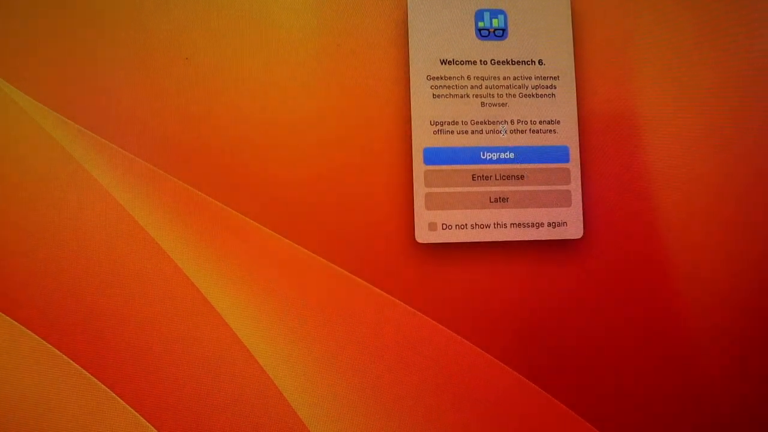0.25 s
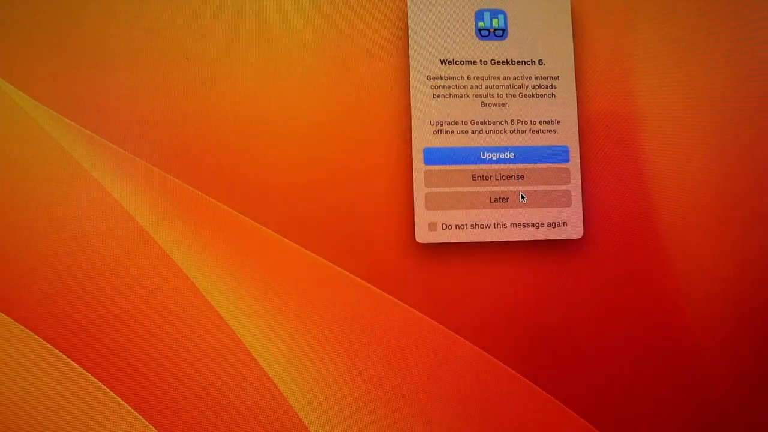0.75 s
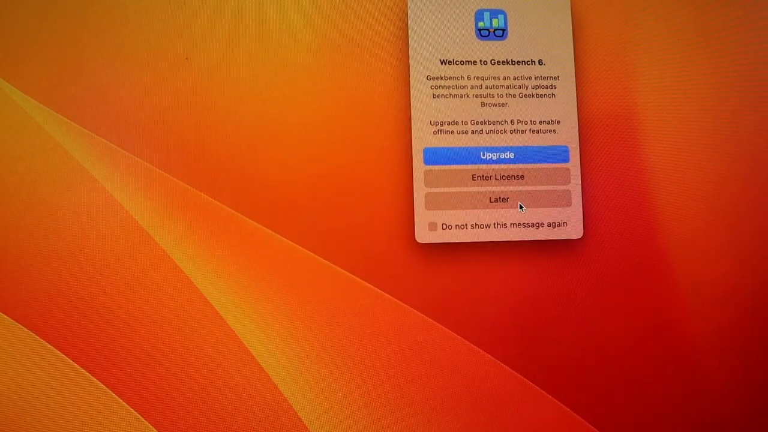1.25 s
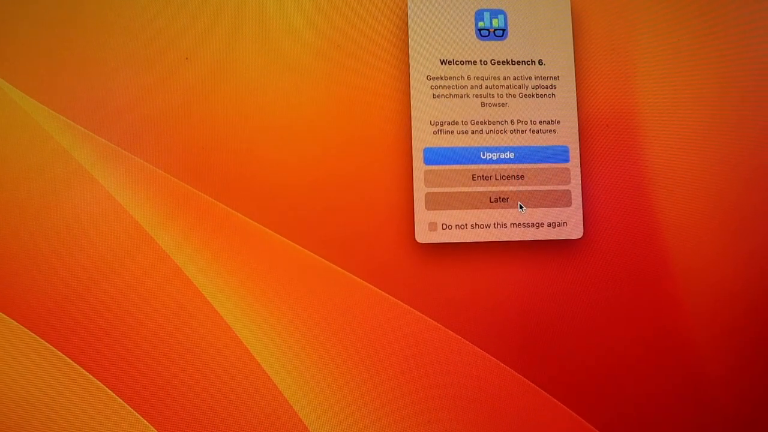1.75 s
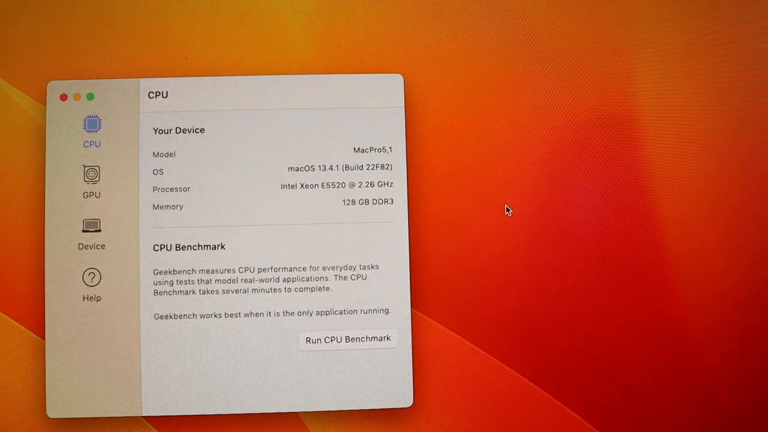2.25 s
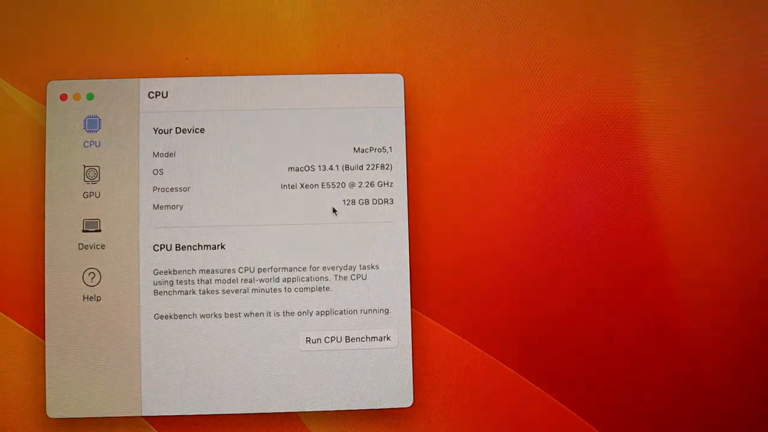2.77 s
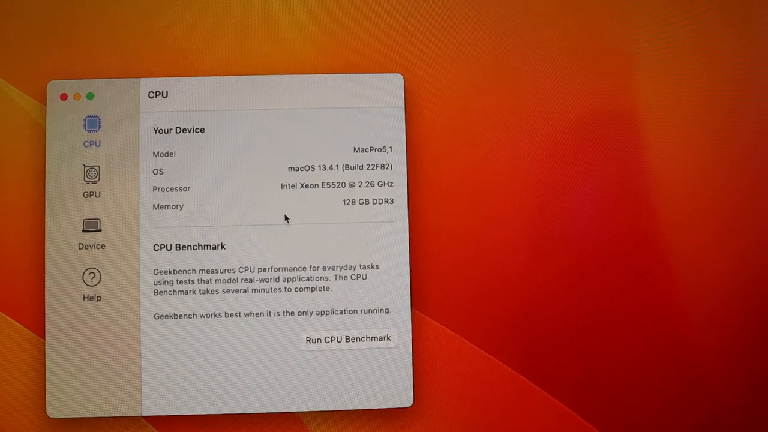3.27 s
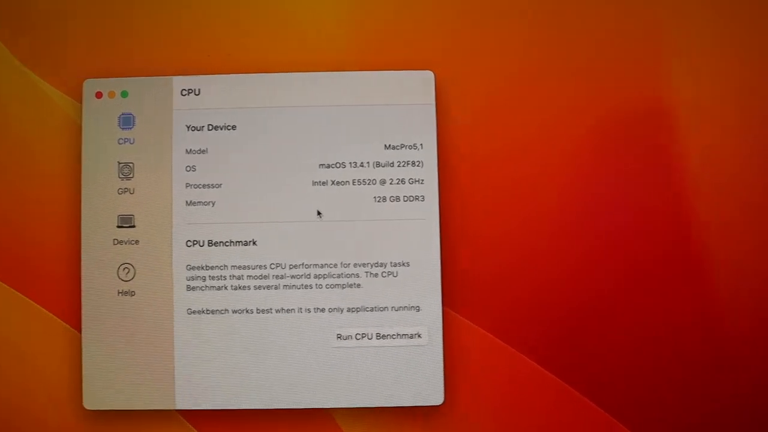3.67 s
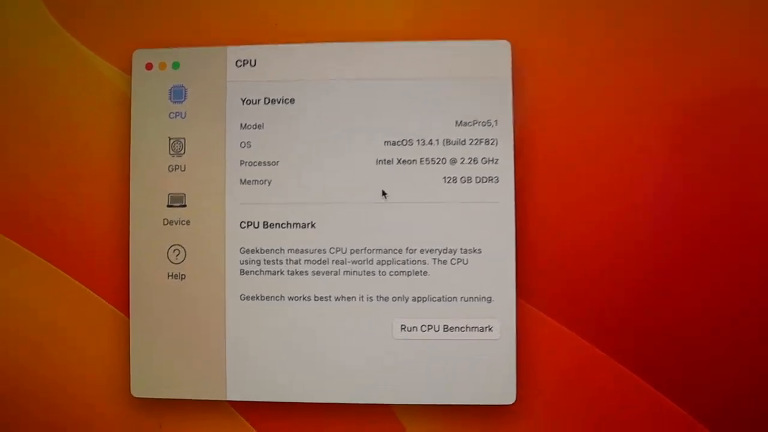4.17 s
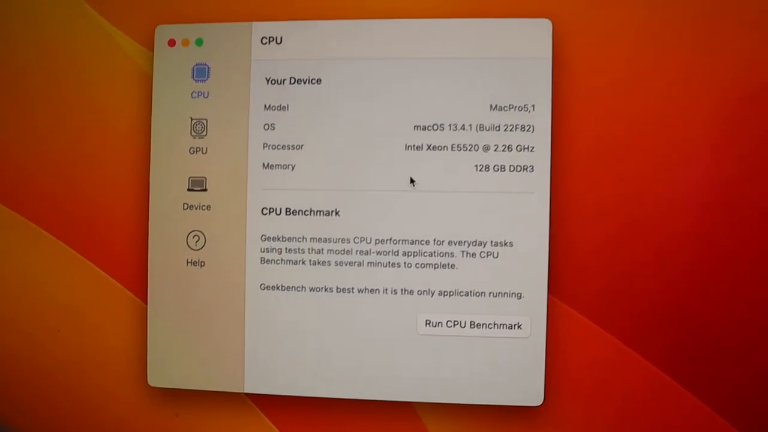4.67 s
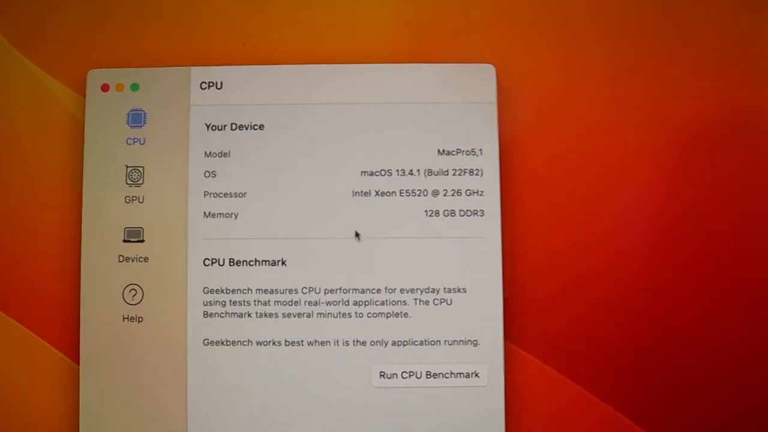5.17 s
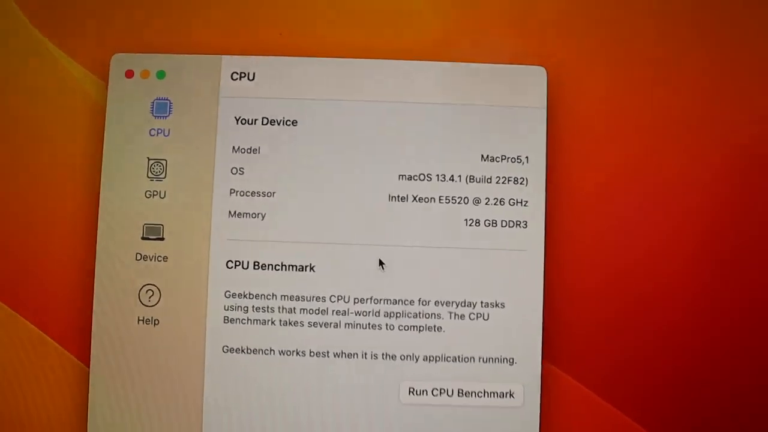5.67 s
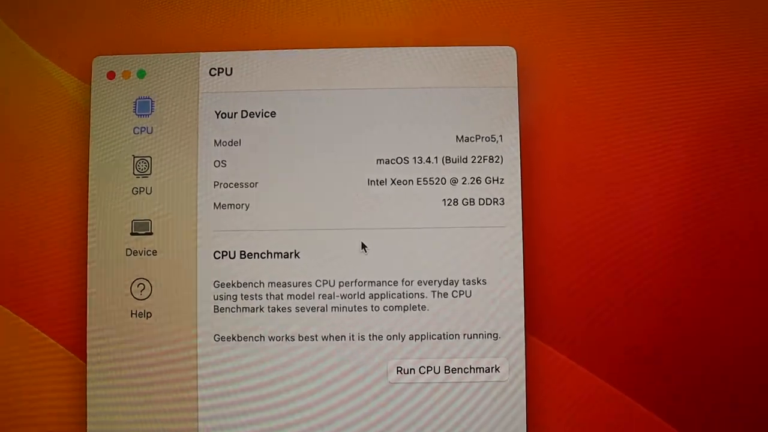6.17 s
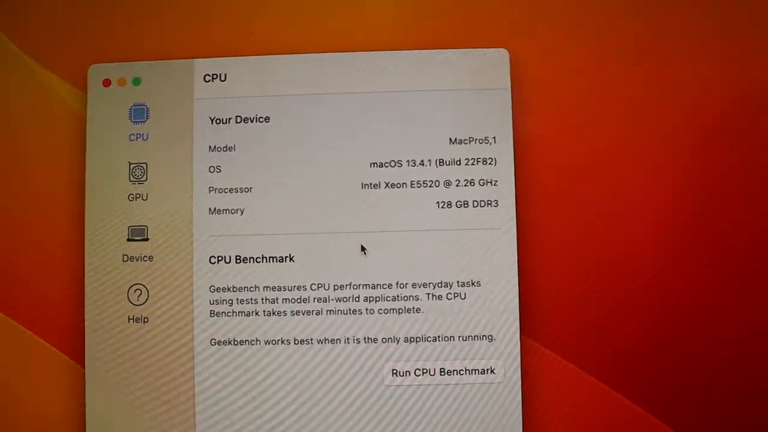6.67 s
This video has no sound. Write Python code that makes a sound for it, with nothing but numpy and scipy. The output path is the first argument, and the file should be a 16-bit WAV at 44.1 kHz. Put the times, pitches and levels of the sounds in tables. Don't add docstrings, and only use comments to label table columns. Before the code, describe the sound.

Throughout, computer cooling fans whir steadily in a quiet, slightly live room: rough mid-low air, soft hiss, a faint steady rotor tone near 690 Hz, ringing ducts and a very faint low disk hum. At 1.3 s a mouse button snaps down, bright and tiny, with its release at 1.46 s. Only fans follow until about 3.4 s, when the mouse taps lightly on the desk, with clearer ticks at 3.6 and 3.8 s. A sleeve brushes softly and the hand squeezes the microphone case in low, muffled creaks and rumbles until about 5.2 s. At 5.26 s the mouse lands hard: a loud, dry plastic clack, short desk boom and quick wheel rattle. Finger thumps follow around 5.6 s. From 5.8 to 6.4 s the mouse pads scrape quietly, slowing down. Around 6.75 s come deep, close thumps on the case, a faint nudge and slide, while the fans continue to the end.

```python
import sys
import numpy as np
from scipy import signal
from scipy.fft import rfft, irfft, next_fast_len
from scipy.io import wavfile
from scipy.ndimage import uniform_filter1d, map_coordinates

SR = 44100
rng = np.random.default_rng(int(sys.argv[2]) if len(sys.argv) > 2 else 0)


def dump(signal):
    limited = np.clip(np.atleast_2d(signal).T, -1, 1)
    pcm = np.round(limited * 32767).astype(np.int16)
    wavfile.write(sys.argv[1], SR, pcm)


def how_loud(loudness_db):
    steps = np.asarray(loudness_db, float) / 20
    return 10 ** steps


N = 305216


# start_s, peak_db, blow_centre_hz, burst_t60_s
CONTACTS = [(3.39, -37, 5000, .03), (3.612, -27, 3000, 0.0087), (3.629, -21.5, 2200, .01),
            (3.6325, -22, 1290, 0.024), (3.788, -24.5, 1900, 0.018), (5.223, -22, 900, 0.047),
            (5.255, -17, 3020, .02), (5.2581, -8.5, 6960, 0.012), (5.2576, -2.5, 2100, 0.0065),
            (5.2592, -4, 960, 0.0031), (5.263, -15.5, 2480, 0.032), (5.545, -27, 15000, 0.0073),
            (5.64, -40, 14000, .006), (5.72, -40, 9000, .02), (6.657, -30, 7000, 0.01),
            (6.735, -39, 12000, .03), (6.762, -33, 500, .02)]
# freq_hz, gain_db
SHELL = [(100, 11), (970, 5.5), (1900, 5), (2800, -2), (5400, 5), (7000, -3.5), (9000, 4.5), (11500, -4),
         (16000, 6)]
# start_s, boom_db
BOOMS = [
    (5.222, -32.5),
    (5.2578, -10.5),
    (6.762, -45),
]
# pitch_hz, level_db, t60_s
DESK_MODES = [(70, -14, 0.14), (130, -6.5, 0.048), (259, -8, 0.1), (292, -11.5, 0.083), (470, -6.5, 0.033)]
ROOM_AT_10MS_DB, ROOM_PER_DOUBLING_DB = -7, 1.2


def contacts():
    out, t = np.zeros(N), np.arange(SR // 2) / SR
    for start_s, peak_db, centre_hz, t60_s in CONTACTS:
        def shell(f):
            blow = resonances([(centre_hz, 1.03 * centre_hz, 0)], f) ** 2
            return blow * how_loud(along(SHELL, f))

        knock = how_loud(peak_db) * peaked(filtered(burst(t, 0.00089, t60_s), shell))
        room_db = ROOM_AT_10MS_DB + ROOM_PER_DOUBLING_DB * np.log2(100 * t60_s)
        add(out, start_s, knock + how_loud(room_db) * reverb(knock))
    boom = ringing(DESK_MODES, t) * onset(t, 0.002)
    for start_s, boom_db in BOOMS:
        add(out, start_s, -how_loud(boom_db) * boom)
    return out


# start_s, peak_db, burst_t60_s
RATTLE = [
    (5.2895, -24, .02),
    (5.2922, -11.5, .018),
    (5.2945, -12.5, .012),
    (5.2985, -17, .022),
    (5.311, -24, .04),
    (5.338, -30, .04),
]
# centre_hz, width_hz, level_db
WHEEL_MODES = [(3420, 810, -5.5), (6930, 950, -3), (7370, 310, 4), (8730, 950, -2), (11000, 3400, -7),
               (14000, 4700, -8)]


def rattle():
    out, t = np.zeros(N), np.arange(SR // 2) / SR
    for start_s, peak_db, t60_s in RATTLE:
        chatter = filtered(burst(t, 0.00074, t60_s), lambda f: resonances(WHEEL_MODES, f))
        chatter = how_loud(peak_db) * peaked(chatter)
        add(out, start_s, chatter + how_loud(-10) * reverb(chatter))
    return out


# start_s, peak_db, ring_re_crack_db, ring_decay_factor
BUTTON = [
    (1.3104, -26, 1.5, 0.77),
    (1.4603, -21, -8, .5),
]
# pitch_hz, level_db, t60_s
SWITCH_MODES = [(1900, 6, .006), (4300, -8, 0.0061), (6100, 0, .01), (8700, -2, 0.017), (10200, -8, 0.0071),
                (12600, 1, 0.012), (15000, -6, .008)]
# freq_hz, level_db
CRACK = [(1500, -30), (3500, -4), (6000, -5), (8500, 2), (11000, -12), (13000, 1), (16000, -18)]


def button():
    out, t = np.zeros(N), np.arange(SR // 3) / SR
    for start_s, peak_db, ring_db, decay_factor in BUTTON:
        ring = ringing(SWITCH_MODES, t, decay_factor)
        crack = filtered(burst(t, 0.00025, 0.013), lambda f: how_loud(along(CRACK, f)))
        crack = 1.16 * peaked(crack)
        snap = how_loud(peak_db) * (how_loud(ring_db) * ring + crack) * onset(t, 0.00049)
        add(out, start_s, snap + how_loud(-8.5) * reverb(snap))
        add(out, start_s + 0.0076, how_loud(-11) * snap)
    return out


# start_s, brake_s, stop_s, full_speed_db
STROKES = [
    (5.825, 5.92, 5.985, -37.5),
    (5.966, 6.056, 6.415, -35.5),
    (6.65, 6.74, 6.78, -50),
]
# freq_hz, density_db_per_hz
SCRAPE = [(1000, -7.5), (2000, 1), (2700, -4.5), (3600, -1.5), (5500, -6), (7500, -8), (8700, -9.5),
          (10500, -10.5), (13000, -13), (16000, -19)]
# centre_hz, width_hz, level_db
PAD_MODES = [(3570, 200, -1), (4300, 100, -4), (5200, 130, -3), (6500, 110, 4), (8690, 200, 2),
             (9880, 250, -1), (13000, 500, 4)]
PAD_MODES_DB, SHEEN_DB, PUSH_S = -3, -15, 0.026
BODY_POWER, SHEEN_POWER = 0.77, 1.3


def slide():
    t = np.arange(N) / SR
    scrape = how_loud(0.8 * wobble(35)) * rippled(rush(SCRAPE, patchy_db=1.5), ECHO_DB + 7)
    scrape = filtered(scrape, lambda f: 1 + how_loud(PAD_MODES_DB) * np.abs(resonances(PAD_MODES, f)))
    body = filtered(scrape, lambda f: 1 / (1 + (f / 9000) ** 8))
    sheen = how_loud(SHEEN_DB) * unit(scrape - body)
    body = unit(body)
    out = np.zeros(N)
    for start_s, brake_s, stop_s, level_db in STROKES:
        speed = np.interp(t, [start_s, start_s + PUSH_S, brake_s, stop_s], [0, 1, 1, 0])
        out += how_loud(level_db) * (speed ** BODY_POWER * body + speed ** SHEEN_POWER * sheen)
    return out


# time_s, rumble_db
GRIP = [(3.15, -81), (3.38, -46), (3.6, -61), (4.0, -61), (4.33, -48), (4.9, -52.5), (5.01, -44.5),
        (5.18, -49), (5.29, -40), (5.47, -47), (5.67, -38.5), (5.8, -50), (6.12, -45.5), (6.3, -53),
        (6.36, -71), (6.63, -56), (6.71, -43), (6.92, -44)]
# freq_hz, density_db_per_hz
RUMBLE = [(12, -20), (30, -4), (60, -4.5), (90, -9.5), (200, -46), (500, -60)]
# start_s, hold_s, hum_db, slip_re_hum_db
SQUEEZES = [(3.41, .02, -49, -3), (3.755, .02, -47, -9), (3.906, 0.027, -44, -12), (4.167, .01, -41.5, -8),
            (4.29, .02, -51, -8), (4.434, 0.024, -44.5, -1), (4.605, 0.011, -45, -5), (4.67, .03, -44, -6),
            (4.76, .01, -46, -1), (5.003, .02, -44, -7), (5.12, .03, -51, -12), (5.27, .05, -42.5, 7.5),
            (5.377, 0.046, -38, -3), (5.62, .03, -46, 0), (5.68, 0.029, -39.5, -12), (5.965, .01, -47, -14),
            (6.1, 0.027, -44, -3), (6.25, .03, -42.5, -7), (6.753, 0.026, -40, -10)]
# start_s, peak_db, pitch_hz, t60_s
THUMPS = [
    (5.55, -31, 470, 0.053),
    (5.574, -27, 130, 0.075),
    (5.672, -27.5, 467, .06),
    (6.727, -21.5, 77, .06),
    (6.76, -14.5, 110, 0.039),
    (6.781, -15, 86, 0.039),
    (6.876, -38, 45, 0.064),
]
HUM_DB, RUSTLE_DB = -3.5, -5
SQUEEZE_RISE_DB_S, SQUEEZE_FALL_DB_S = 370, 320


def hand():
    effort = how_loud(curves(GRIP)[0])
    rumble = even(rush(RUMBLE, patchy_db=9))
    hum = filtered(rng.standard_normal(N), lambda f: resonances([(125.7, 54, 0)], f) ** 2)
    hum = even(unit(hum))
    skin_modes = [(229, 100, 1.2), (493, 285, -0.77)]
    rustle = unit(filtered(rng.standard_normal(N), lambda f: resonances(skin_modes, f) ** 2))

    presses = [(s, hold_s, hum_db) for s, hold_s, hum_db, slip_db in SQUEEZES]
    slips = [(s, hold_s, hum_db + slip_db) for s, hold_s, hum_db, slip_db in SQUEEZES]
    pressed = swells(presses, SQUEEZE_RISE_DB_S, SQUEEZE_FALL_DB_S)
    slipped = swells(slips, SQUEEZE_RISE_DB_S, SQUEEZE_FALL_DB_S)
    out = effort * rumble
    out += np.hypot(how_loud(HUM_DB) * effort, pressed) * hum
    out += np.hypot(how_loud(RUSTLE_DB) * effort, slipped) * rustle

    t = np.arange(SR // 4) / SR
    for start_s, peak_db, pitch_hz, t60_s in THUMPS:
        add(out, start_s, -onset(t, 0.004) * ringing([(pitch_hz, peak_db + 6, t60_s)], t))
    return out


# start_s, hold_s, level_db
SLEEVE = [
    (3.44, 0.008, -46.5),
    (3.61, 0.2, -46.5),
    (4.31, 0.16, -49),
    (4.63, .05, -56),
    (4.97, 0.34, -48),
]
# freq_hz, density_db_per_hz
CLOTH = [(900, -35), (2000, 4.5), (4000, -0.5), (8000, -8), (15000, -30)]
SLEEVE_RISE_DB_S, SLEEVE_FALL_DB_S = 140, 160


def sleeve():
    grains = unit(how_loud(0.91 * wobble(45)) * rush(CLOTH, patchy_db=3.5))
    return swells(SLEEVE, SLEEVE_RISE_DB_S, SLEEVE_FALL_DB_S) * grains


# time_s, level_db
FLOW = [(0.0, -36.5), (0.27, -37.5), (1.95, -36.5), (2.95, -37.5), (4.1, -36.5), (4.84, -37), (6.17, -36),
        (6.4, -36.5), (6.92, -36)]
# freq_hz, density_db_per_hz
AIR = [(15, -29), (50, -21), (90, -20), (125, -14), (188, -17.5), (230, -11), (320, -12), (390, -16),
       (650, -11.5), (1000, -12), (1800, -12.5), (2600, -18.5), (3600, -26), (6000, -110)]
# freq_hz, density_db_per_hz
HISS = [(1530, -27), (2600, -9), (3540, -6.5), (3900, -2.5), (4640, -5), (5480, -5), (7180, -9.5),
        (10700, -20), (15100, -23.5), (15700, -25)]
# time_s, seventh_order_hz
ROTOR = [(0.0, 686.9), (4.12, 687.2), (5.09, 684.5), (6.71, 684.2), (6.92, 682.1)]
SHAFT_ORDERS = [7, 8, 9, 11, 16, 24, 40, 75.2, 84]
# level_db, flutter_db
ORDER_LEVELS = [(-45.5, 1.3), (-52.5, 2), (-59, 3), (-60, 3), (-62, 2.5), (-65, 2.5), (-70, 2.5),
                (-73, 1.5), (-74, 1.5)]
DUCT_HZ = [122, 245, 345, 1135, 1168, 1343, 1365, 1563, 1660, 1810]
# width_hz, level_db
DUCT_TONES = [(20.7, -55), (25, -64.5), (14, -57), (53, -53), (18, -55), (12, -52), (14, -52.5),
              (28, -51.5), (30, -69), (30, -56)]
# pitch_hz, level_db
DRIVE = (75.4, -61)
ECHO_DB = -12


def duct_gain(f):
    power = 0
    for hz, (width_hz, level_db) in zip(DUCT_HZ, DUCT_TONES):
        gain = np.abs(how_loud(level_db) * resonances([(hz, width_hz, 0)], f) ** 2)
        power = power + gain ** 2 * 2 * SR / (np.pi * width_hz)
    return np.sqrt(power)


def fans():
    flow_db, = curves(FLOW)
    air = rush(AIR, patchy_db=0.53) + how_loud(-8.5) * rush(HISS, patchy_db=0.33)
    air = how_loud(-2.0 + 0.32 * wobble(1.64)) * rippled(air, ECHO_DB)

    shaft_hz = curves(ROTOR)[0] / 7 * (1 + 0.0015 * wobble(12))
    turn = 2 * np.pi * np.cumsum(shaft_hz) / SR
    tones = np.zeros(N)
    for order, (level_db, flutter_db) in zip(SHAFT_ORDERS, ORDER_LEVELS):
        gain = how_loud(level_db + 3.0 + flutter_db * wobble(8.1))
        tones += gain * np.sin(order * turn + 7 * rng.random())

    ducts = filtered(rng.standard_normal(N), duct_gain)
    drive_hz, drive_db = DRIVE
    drive = how_loud(drive_db + 2.0) * np.sin(2 * np.pi * drive_hz * np.arange(N) / SR)
    return how_loud(flow_db) * air + how_loud(flow_db - np.mean(flow_db)) * (tones + ducts) + drive


# freq_hz, t60_s
ROOM = [(200, 0.49), (2000, 0.5), (8000, 0.41), (15000, 0.22)]


def reverb(x):
    hz, t, z = signal.stft(rng.standard_normal(SR // 2), SR, nperseg=256)
    decay = how_loud(-60 * t / along(ROOM, hz)[:, None])
    tail = signal.istft(z * decay, SR, nperseg=256)[1]
    delayed = np.pad(x, (200, 0))
    return signal.fftconvolve(delayed, tail / np.linalg.norm(tail))[:len(x)]


def rippled(x, echo_db):
    echoes = how_loud(-60 * np.arange(4000) / SR / 0.09) * rng.standard_normal(4000)
    return unit(x + how_loud(echo_db) * unit(signal.fftconvolve(x, echoes)[:N]))


def rush(spectrum, patchy_db):
    z = signal.stft(rng.standard_normal(N), nperseg=512)[2]
    field = uniform_filter1d(rng.standard_normal(z.shape), size=6, axis=0)
    field = uniform_filter1d(field, size=12, axis=1)
    x = signal.istft(z * how_loud(patchy_db * unit(field)), nperseg=512)[1][:N]
    return unit(filtered(x, lambda hz: how_loud(along(spectrum, hz))))


def burst(t, rise_s, t60_s):
    z = rfft(how_loud(-60 * t / t60_s) * onset(t, rise_s) * rng.standard_normal(len(t)))
    size = uniform_filter1d(np.abs(z), size=100)
    return irfft(z / (size + 0.3 * np.mean(size)), len(t)) * (t < 0.1)


def ringing(modes, t, decay_factor=1):
    return sum(how_loud(level_db - 60 * t / (t60_s * decay_factor)) * np.sin(2 * np.pi * hz * t)
               for hz, level_db, t60_s in modes)


def resonances(modes, f):
    return sum((-1) ** k * how_loud(db) * 1j * f * width / (centre * centre - f * f + 1j * f * width)
               for k, (centre, width, db) in enumerate(modes))


def swells(rows, rise_db_s, fall_db_s):
    t = np.arange(0, N / SR, 0.001)
    power = np.zeros(len(t))
    for start_s, hold_s, level_db in rows:
        before_db = rise_db_s * np.maximum(start_s - t, 0)
        after_db = fall_db_s * np.maximum(t - start_s - hold_s, 0)
        power += how_loud(level_db - before_db - after_db) ** 2
    return np.interp(np.arange(N) / SR, t, np.sqrt(power))


def onset(t, rise_s):
    return 1 - np.exp(-t / rise_s)


def even(x):
    return unit(x / np.sqrt(np.abs(uniform_filter1d(x ** 2, size=3500)) + 0.05))


def wobble(rate_hz):
    knots = rng.standard_normal(int(N * 60 / SR))
    return map_coordinates(knots, [np.arange(N) * min(rate_hz, 50) / SR])


def curves(rows):
    time_s, *columns = np.transpose(rows)
    return [np.interp(np.arange(N) / SR, time_s, column) for column in columns]


def along(points, hz):
    f, v = np.transpose(points)
    return np.interp(np.log(hz + 1), np.log(f + 1), v)


def filtered(x, response):
    m = next_fast_len(len(x) + SR // 2)
    return irfft(rfft(x, m) * response(np.fft.rfftfreq(m, 1 / SR)), m)[:len(x)]


def unit(x):
    return x / np.sqrt(np.mean(x ** 2) + 1e-20)


def peaked(x):
    return x / np.max(np.abs(x))


def add(track, start_s, x):
    part = track[round(start_s * SR):][:len(x)]
    part += x[:len(part)]


def scene():
    mono = contacts() + rattle() + button() + slide() + hand() + sleeve() + fans()
    return np.tile(mono, (2, 1))


def band_limit(x):
    return signal.sosfilt(signal.butter(12, 16510, fs=SR, output="sos"), x)


def record(dry):
    top_hz, ceiling = 15760, 0.99
    x = np.array([filtered(channel, lambda hz: hz < top_hz) for channel in dry])
    x = x / (1 + np.abs(x / ceiling) ** 8) ** (1 / 8)
    return band_limit(x)


dry = scene()
out = record(dry)
dump(out)
```